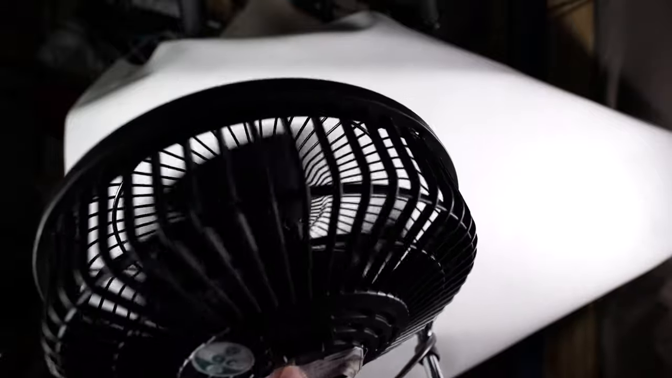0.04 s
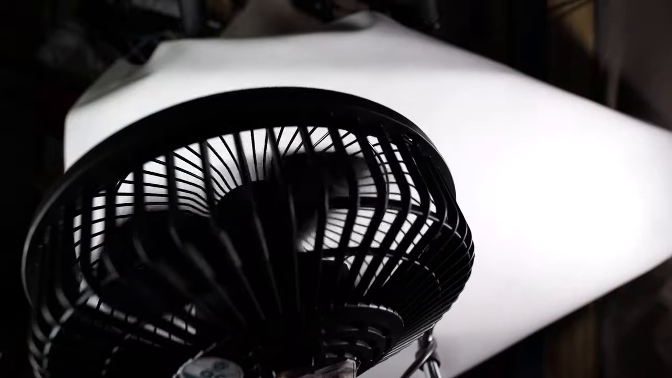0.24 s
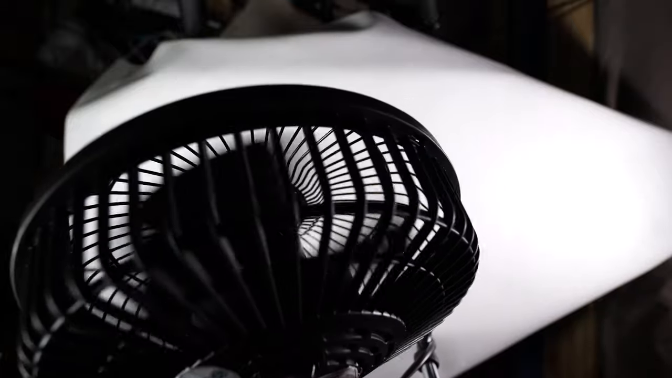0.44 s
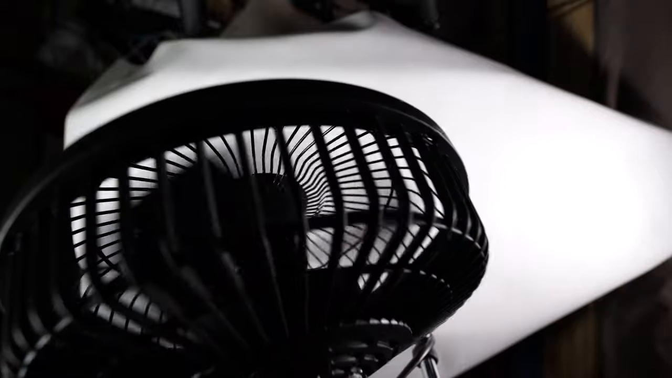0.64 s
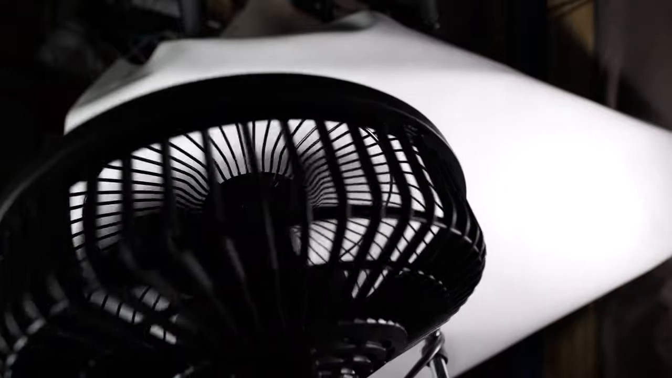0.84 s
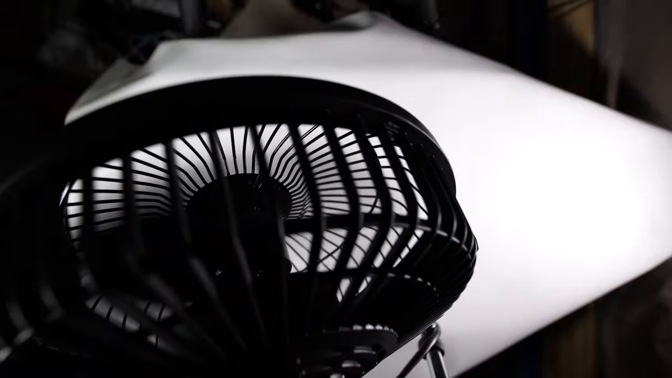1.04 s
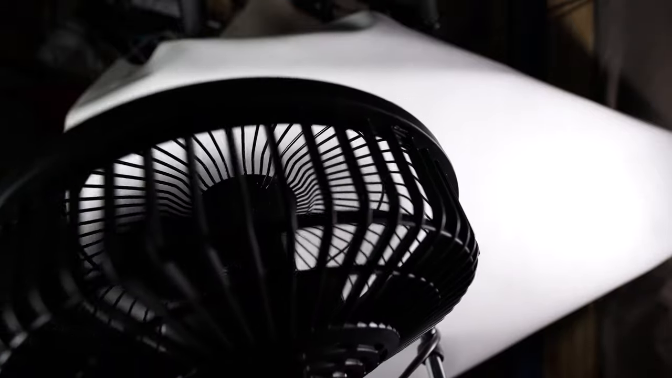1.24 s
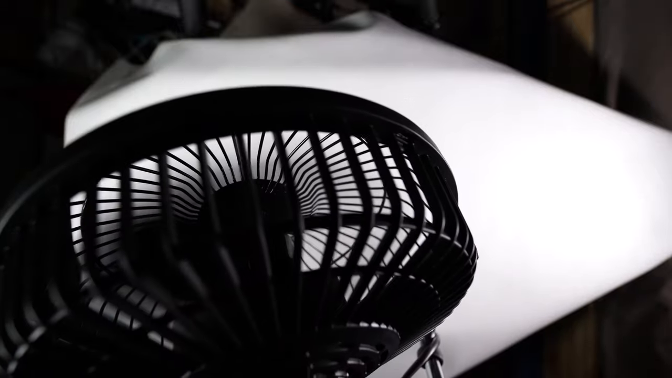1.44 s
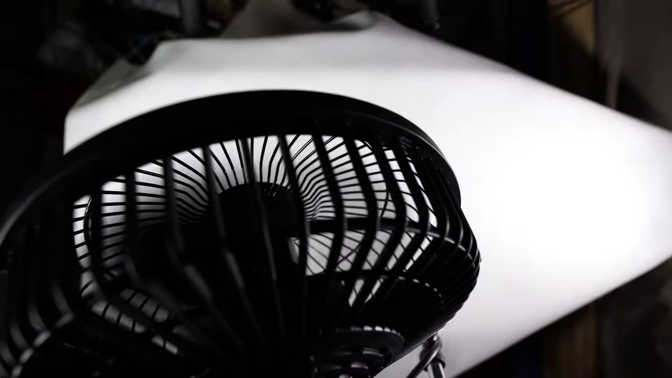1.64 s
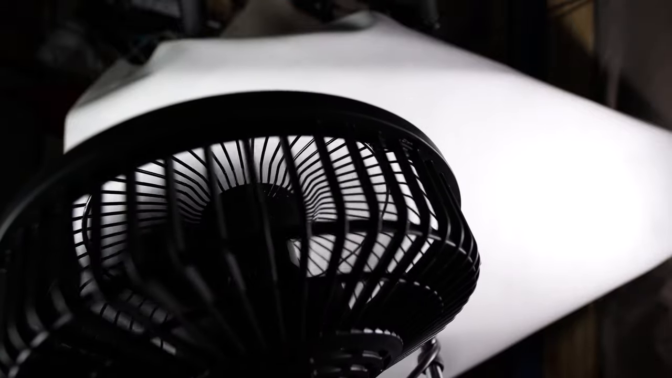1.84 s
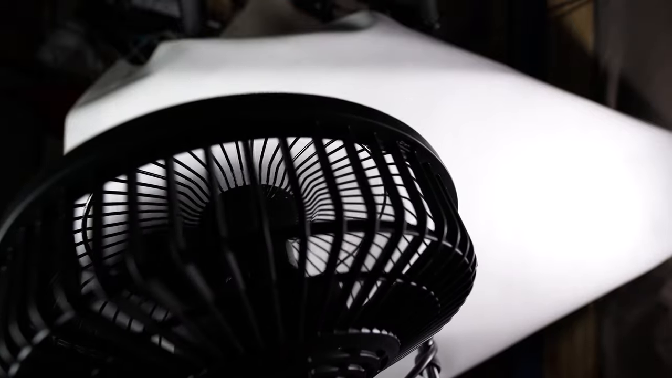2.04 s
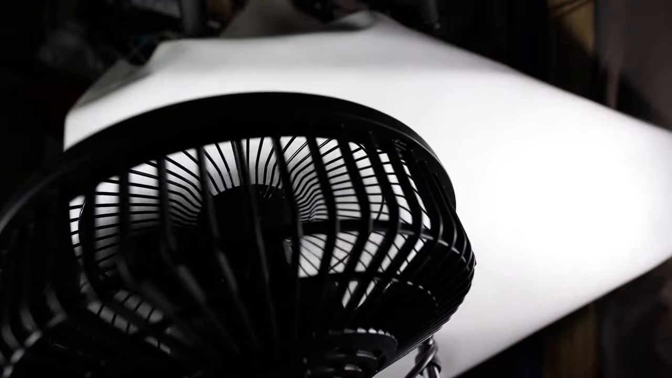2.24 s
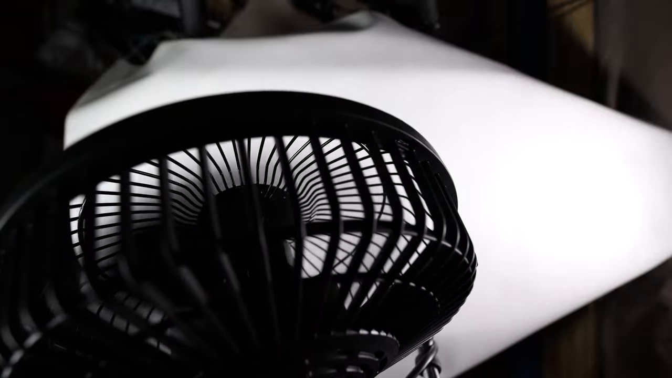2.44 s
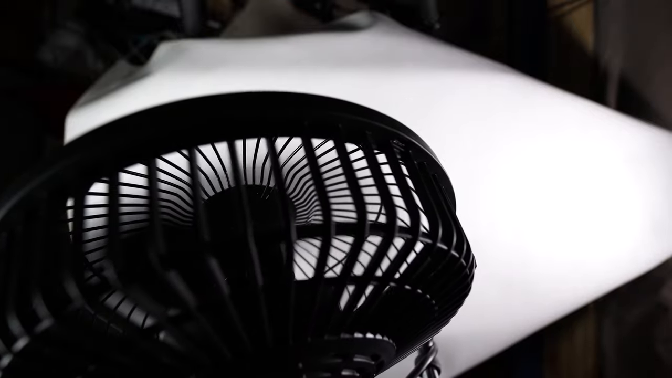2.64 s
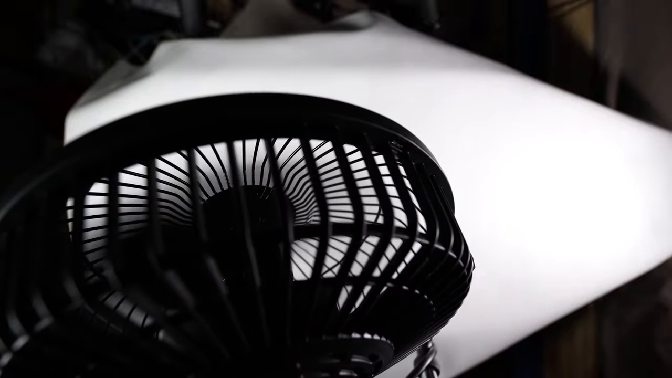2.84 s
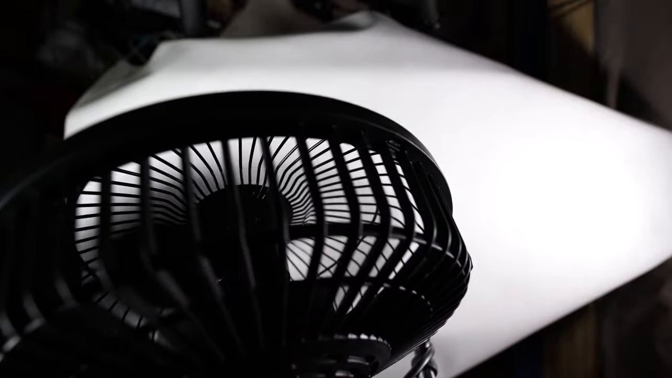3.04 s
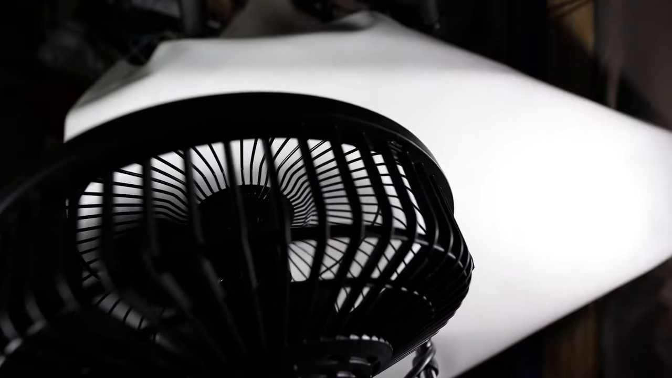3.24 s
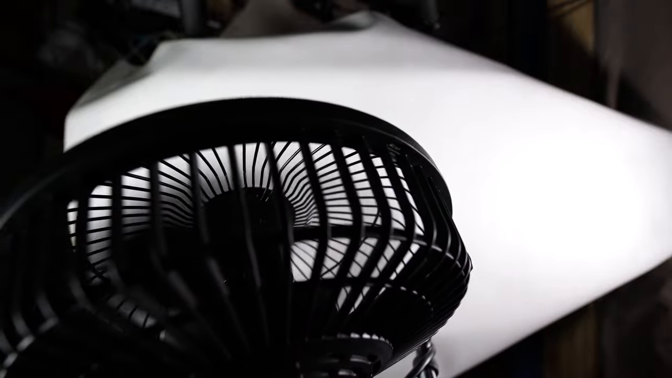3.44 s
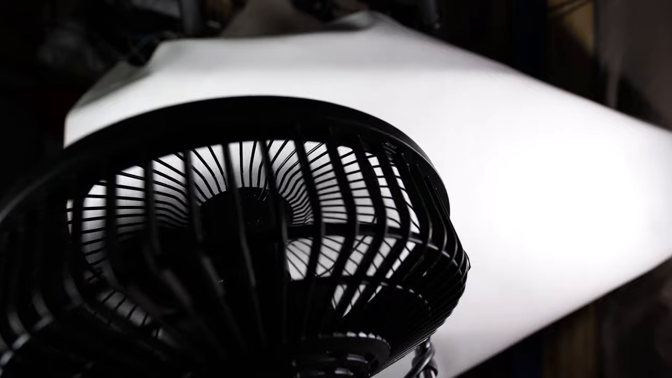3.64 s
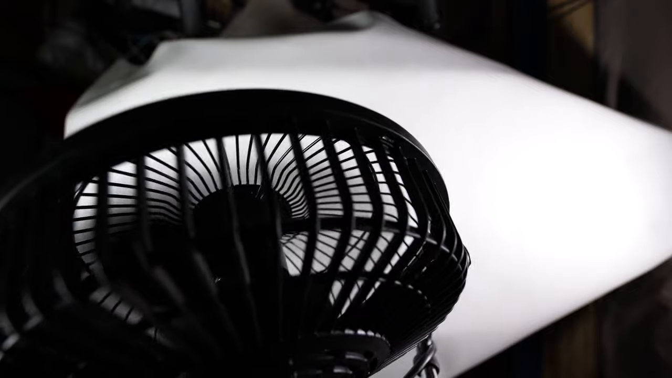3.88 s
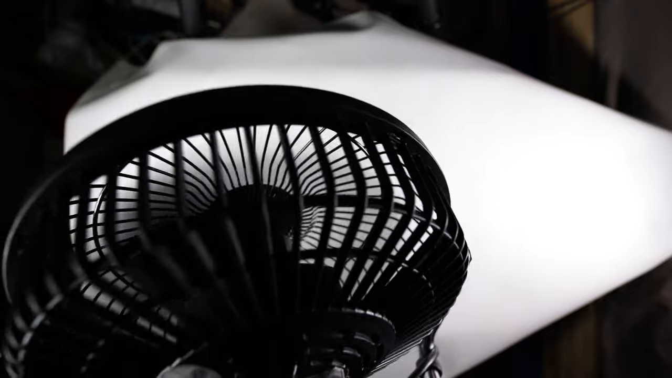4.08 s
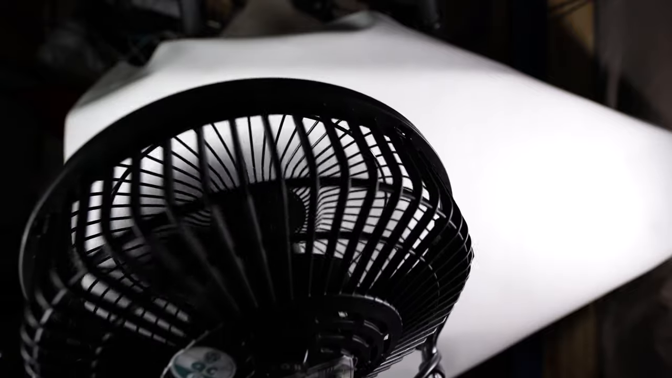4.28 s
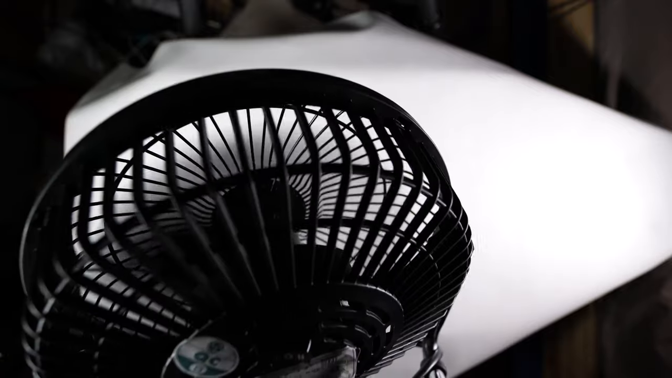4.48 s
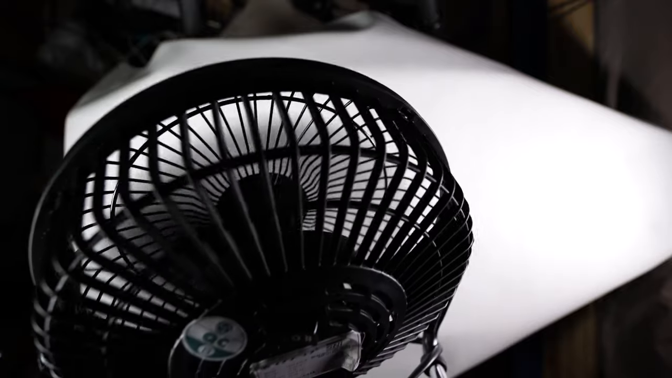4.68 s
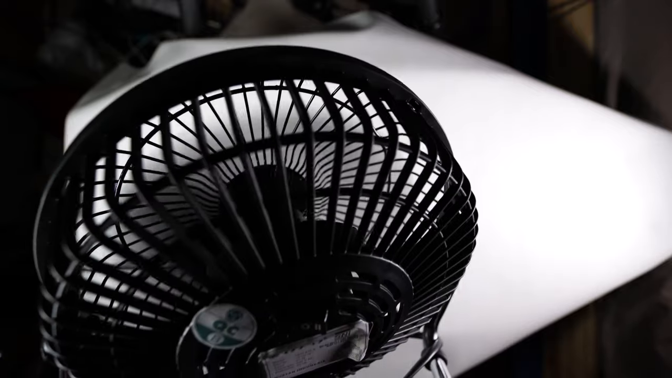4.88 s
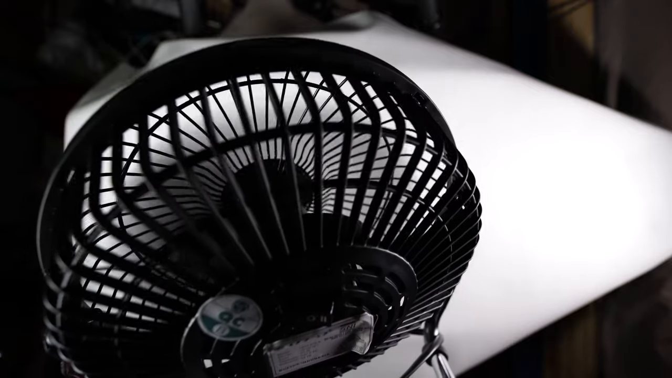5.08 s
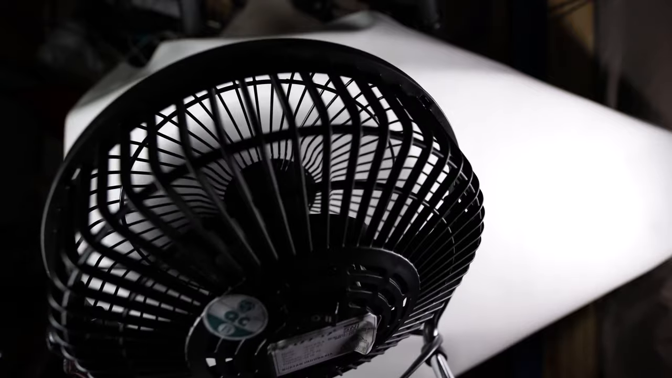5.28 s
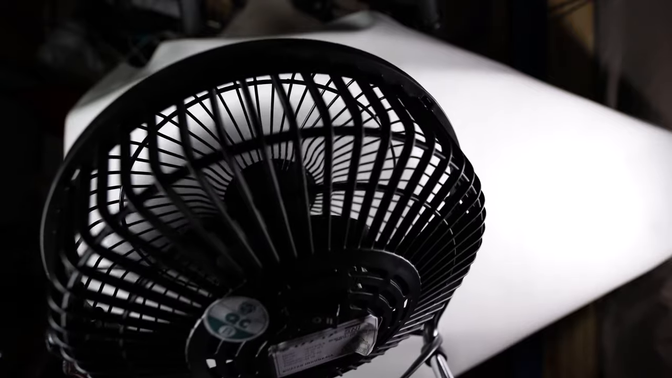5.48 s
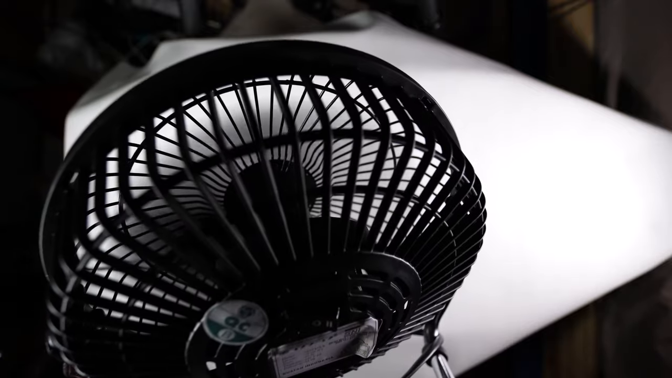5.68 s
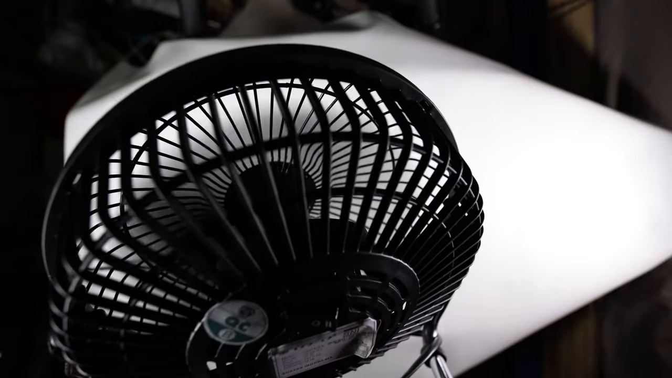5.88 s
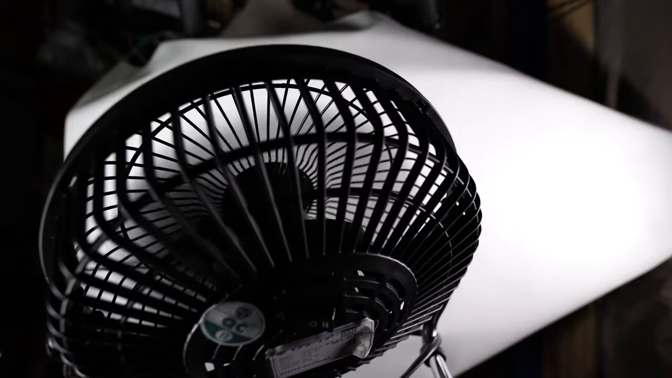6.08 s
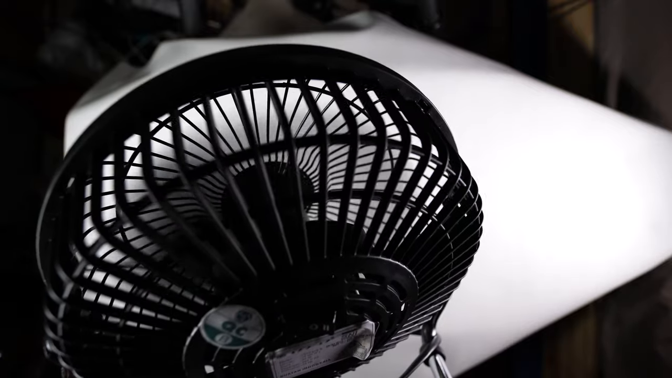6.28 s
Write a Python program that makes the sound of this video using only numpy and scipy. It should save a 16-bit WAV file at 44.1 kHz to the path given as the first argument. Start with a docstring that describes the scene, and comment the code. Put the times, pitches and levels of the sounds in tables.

```python
"""Desk fan starting up close by

In a quiet room, a hand bumps the base of a small three-bladed fan near the microphone; the switch snaps.
The stand settles, the motor hums at twice the mains frequency and the rotor brushes lightly, once a turn.
Blade tones and rushing air follow the computed rotor speed, then run steadily and sway as the fan is tilted.
Contacts ring resonances of housing and stand; air and room are coloured noise."""
import sys
import numpy as np
from scipy import signal
from scipy.fft import rfft, irfft, next_fast_len
from scipy.io import wavfile

SR = 44100
rng = np.random.default_rng(int(sys.argv[2]) if len(sys.argv) > 2 else 0)


def to_wav(s):
    """Save 16-bit WAV."""
    ch = np.atleast_2d(s).T  # columns
    pcm = np.round(np.clip(ch, -1, 1) * 32767)  # PCM
    wavfile.write(sys.argv[1], SR, pcm.astype(np.int16))


N = 278271
TIME = np.arange(N) / SR

# colour of the still room, relative: pitch_hz, level_db_per_hz
ROOM_COLOUR = [(25, -7), (50, 3), (140, -3.5), (300, -13), (470, -18), (850, -15.5), (1020, -14.5),
               (1160, -11), (1290, -24), (1600, -18), (2700, -29.5), (5000, -33), (7000, -33.5),
               (10000, -39), (15500, -44)]
# the hand bumps the base: start_s, level_db, pitch_hz, t60_s
BASE_BUMPS = [(.002, -32.5, 227, 0.14), (.135, -41, 223, 0.18), (.208, -36, 220, 0.095),
              (.222, -38.5, 324, 0.077), (0.473, -26, 174, 0.087), (.48, -33, 50.6, .12),
              (.497, -22, 115.6, 0.09), (0.64, -28, 242, 0.016), (0.647, -26.5, 87.6, 0.13),
              (0.654, -37, 54.6, 0.086)]
# small dry ticks of the frame: start_s, level_db, centre_hz, width_hz (of each of two passes), t60_s
FRAME_TICKS = [(0.3862, -45, 1470, 1940, 0.015), (0.671, -53, 5000, 8000, 0.027),
               (0.9964, -40.5, 3200, 7000, 0.008), (1.024, -55, 5000, 8000, .015)]
# the switch snaps over and rebounds, relative: start_s, level_db, grit_0_to_1, length_s (scrape falls 15 dB)
SWITCH_CONTACTS = [(.4718, 1, 0.28, 0.0023), (.4875, -32, .95, .004), (.4908, -17.5, 1, 0.003)]
# resonances of switch and housing: pitch_hz, half_width_hz (of each of two passes), level_db
HOUSING_MODES = [(990, 180, -5), (1530, 410, -2.5), (2860, 390, -5.5), (3770, 330, 3), (5330, 470, 3.5),
                 (7240, 440, 2), (7980, 610, -2), (8870, 360, -6), (11900, 300, -9), (13300, 640, -9.5)]
# the stand chatters as the hand lets go, relative: start_s, level_db, grit_0_to_1, length_s (scrape falls 15 dB)
STAND_CONTACTS = [(.6396, -33, 0.7, .004), (.6422, -17, 0.5, 0.0045), (.6445, -9.5, 0.96, 0.0032),
                  (.6475, -22.5, 1, 0.0043), (.6522, -20.5, 0.3, 0.0022)]
# resonances of the stand: pitch_hz, half_width_hz (of each of two passes), level_db
STAND_MODES = [(1060, 240, -4), (1860, 450, -2), (2430, 220, 4.5), (3760, 640, -4), (5540, 400, 5.5),
               (5500, 180, -11), (7130, 230, -3), (8400, 1300, -7.5), (13400, 1500, -21)]
# colour of the room's answer to the contacts, relative: pitch_hz, level_db_per_hz
ECHO_COLOUR = [(300, -52), (1000, -9), (1700, 4), (3000, -3.5), (3800, 2), (4500, -3), (5300, 6.5),
               (6800, -11), (8800, -6), (10500, -19), (15000, -14)]
# rotor unbalance at full speed: multiple_of_shaft_rate, level_db
UNBALANCE_PARTIALS = [(1, -37), (2, -44.5), (4, -52), (5, -59), (7, -62.5), (8, -68.5), (10, -61.5),
                      (14, -61.5)]
# colour of the rushing air at full speed, relative: pitch_hz, level_db_per_hz
AIR_COLOUR = [(25, -0.5), (130, 3), (240, -4.5), (350, -8.5), (650, -11.5), (1050, -10), (1750, -12),
              (2400, -15), (3100, -17.5), (4000, -23.5), (5100, -23), (7000, -34.5), (10500, -41.5),
              (15500, -51)]
# growth of the air, faster for hiss than for rumble: pitch_hz, growth_db_per_doubling_of_speed
AIR_GROWTH_CURVE = [(60, 4), (350, 9.5), (1000, 22.5), (2400, 22.5), (5000, 32.5), (14000, 21)]
# the air runs a little louder while the rotor gathers speed, then settles: time_s, level_db
AIR_LEVEL_SHIFT = [(1.0, 4), (2.05, 3), (2.5, -0.24), (5.0, 0.12), (6.3, -.7)]
# blade wakes slapping the guard at full speed: multiple_of_blade_rate, level_db
WAKE_PARTIALS = [(5, -50), (6, -55), (7, -54.5), (8, -52.5), (10, -59), (11, -58), (12, -62.5), (13, -60.5),
                 (14, -57.5), (16, -57.5), (17, -67.5), (18, -57)]
# guard buzz as the rotor passes through its resonance: multiple_of_blade_rate, peak_level_db
GUARD_BUZZ_PARTIALS = [(5, -39), (6, -41.5)]
# colour of the brief hiss, relative: pitch_hz, level_db_per_hz
HISS_COLOUR = [(500, -17), (2500, -4), (7000, -2), (10000, -2), (15000, -5)]
# what the brushing rings with, relative: pitch_hz, width_hz, level_db
BRUSH_RESONANCES = [(2510, 180, 3.5), (3340, 370, 3.5), (6840, 150, 8), (7550, 360, 5.5), (8900, 500, -2)]
# the rotor rubs harder: centre_s, half_length_s, level_db
HARDER_RUBS = [(0.94, .04, -63.5), (1.01, .022, -62.5)]
# blade tones: multiple_of_blade_rate, full_speed_level_db, growth_db_per_doubling_of_speed,
# extra_in_swell_db, extra_once_tilted_db, unrest_0_to_1
BLADE_PARTIALS = [(1, -21.8, 13.5, 4.5, 1, 0.02), (2, -38, 2.5, 6, 2, 0.2), (3, -48.5, 15, 7.5, -7.5, 0.18),
                  (4, -42.5, 6.5, -0.5, 0, 0.15)]
# the deep blade tone sways as the fan is moved: time_s, level_db
DEEP_TONE_SWAY = [(2.0, -0.5), (2.4, 2), (2.98, -2), (3.3, 1.5), (3.85, -1.1), (4.5, -5), (5.3, -0.5),
                  (6.3, -3.5)]
# so does the whine two octaves above it: time_s, level_db
WHINE_TONE_SWAY = [(2.2, -1), (2.8, 2), (4.0, -2), (4.55, -4.5), (5.0, 0), (5.5, -6), (6.0, -0.5)]

SWITCH_ON_S, LET_GO_S = .472, .735   # LET_GO_S: the hand leaves the base
FULL_SPEED_HZ, BLADE_COUNT = 104.15, 3   # full speed in blade passes per s
SPIN_UP_S = 1.184   # time to reach three quarters of full speed
# tilting loads the rotor for a moment: centre, half length, blade passes per s lost
TILT_S, TILT_LENGTH_S, TILT_SAG_HZ = 4.45, .4, .6
SWELL_HZ, SWELL_WIDTH_HZ = 86.6, 9.4   # blade rates at which the blade tones swell
WAKE_GROWTH_DB = 2.2   # per doubling of speed and per multiple: higher overtones come in later
MAINS_HUM_HZ, HUM_ATTACK_S = 100, .019
ROOM_HUM_DB, RUNNING_HUM_DB, HUM_OCTAVE_DB = -54, -43.5, -48.5
HELD_HUM_DB, HELD_OCTAVE_DB = 3, -8   # change while the hand presses on the base
BRUSH_START_S, BRUSH_DB = .79, -64.5   # the level is that for standstill
HISS_START_S, HISS_LENGTH_S, HISS_EDGE_S, HISS_DB = .667, .058, .008, -57.5
CUTOFF_HZ = 15800


def from_db(db):
    """Decibels to gain."""
    return 10 ** (np.asarray(db) / 20)


def rms_one(x):
    """Scale to unit rms."""
    return x / np.sqrt(np.mean(x ** 2) + 1e-20)


def in_time(rows):
    """Level curve, sample by sample."""
    time_s, level_db = np.transpose(rows)
    return np.interp(TIME, time_s, level_db)


def at_hz(points, hz):
    """Read a spectrum on a log-frequency axis."""
    known_hz, values = np.transpose(points)
    return np.interp(np.log(np.maximum(hz, 1)), np.log(known_hz), values)


def ramp(start, length):
    """An envelope that rises evenly from 0 to 1 and stays there."""
    return np.clip((TIME - start) / length, 0, 1)


def bell(x, centre, width):
    """A smooth hump of height 1."""
    return np.exp(-((x - centre) / width) ** 2)


def dying(start, t60):
    """An envelope that jumps to 1 and falls 60 dB in t60."""
    return (TIME >= start) * np.exp(-np.log(1000) * np.clip((TIME - start) / t60, 0, 2))


def drift(rate):
    """Slow chance of spread 1 that changes about `rate` times a second."""
    step = 40   # samples between slow values
    r = np.exp(-2 * np.pi * rate * step / SR)
    chance = rng.standard_normal(N // step + 2002)
    slow = signal.lfilter([1], [1, -2 * r, r * r], chance)[2000:]   # the filter has settled
    return np.interp(np.arange(N) / step, np.arange(len(slow)), rms_one(slow))


def noise(spectrum):
    """Noise of unit rms with the given colour and nothing below hearing."""
    size = next_fast_len(N)
    hz = np.fft.rfftfreq(size, 1 / SR)
    gain = from_db(at_hz(spectrum, hz)) * (hz > 18)
    return rms_one(irfft(rfft(rng.standard_normal(size)) * gain, size)[:N])


def resonate(x, hz, width):
    """One resonance, with a gain of 1 at its centre."""
    r = np.exp(-np.pi * width / SR)
    poles = [1, -2 * r * np.cos(2 * np.pi * hz / SR), r * r]
    return (1 - r * r) / 2 * signal.lfilter([1, 0, -1], poles, x + 1e-18)


def unsteady_tone(angle, unrest, rate):
    """A partial of about unit rms, shaken in level and phase by eddies."""
    shaken = (1 + unrest * drift(rate)) * np.cos(angle) + unrest * drift(rate) * np.sin(angle)
    return -np.sqrt(2 / (1 + 2 * unrest ** 2)) * shaken


def room():
    """The still room is steady, faint coloured noise."""
    return from_db(-49.5) * noise(ROOM_COLOUR)


def mains_hum():
    """A faint room hum, then the motor's iron too, at twice the mains frequency; it beats with the blade tones."""
    powered = ramp(SWITCH_ON_S, HUM_ATTACK_S)
    held = 1 - ramp(LET_GO_S, HUM_ATTACK_S)
    hum = powered * from_db(RUNNING_HUM_DB + HELD_HUM_DB * held)
    octave = powered * from_db(HUM_OCTAVE_DB + HELD_OCTAVE_DB * held)
    angle = 2 * np.pi * MAINS_HUM_HZ * TIME
    return np.sqrt(2) * ((from_db(ROOM_HUM_DB) + hum) * np.sin(angle) + octave * np.sin(2 * angle))


def bumps():
    """Soft pushes on the base set it thudding briefly, each a dying sine."""
    out = np.zeros(N)
    for start, db, hz, t60 in BASE_BUMPS:
        out += from_db(db) * dying(start, t60) * np.sin(2 * np.pi * hz * (TIME - start))
    return out


def ticks():
    """Brief, broad cracks of the frame with hardly any ring."""
    out = np.zeros(N)
    for start, db, hz, width, t60 in FRAME_TICKS:
        crack = resonate(resonate(rng.standard_normal(N), hz, width), hz, width)
        out += from_db(db) * dying(start, t60) * rms_one(crack)
    return out


def strike(contacts, modes, echo_db, echo_t60):
    """Each contact is a sharp blow with some grit; it rings the part, and the room answers."""
    force, echo_power = np.zeros(N), np.zeros(N)
    for start, db, grit, length in contacts:
        scrape = dying(start, 4 * length) * rng.choice([-1, 1], N)
        force += from_db(db) * grit * scrape / np.sqrt(np.sum(scrape ** 2))
        force[round(start * SR)] += from_db(db) * np.sqrt(1 - grit ** 2)
        echo_power += (from_db(db) * dying(start, echo_t60)) ** 2
    ringing = np.zeros(N)
    for hz, half_width, db in modes:
        # two passes: each resonance swells for a moment as the blow spreads through the part
        spreading = resonate(force, hz, 2 * half_width)
        ringing += from_db(db) * resonate(spreading, hz, 2 * half_width)
    return ringing + from_db(echo_db) * np.sqrt(echo_power) * noise(ECHO_COLOUR)


def switch_snap():
    """The switch snaps over, rebounds and rings the housing."""
    return from_db(12.5) * strike(SWITCH_CONTACTS, HOUSING_MODES, echo_db=-52.0, echo_t60=.32)


def stand_settling():
    """The stand chatters through a few gritty contacts and rings."""
    return from_db(11.0) * strike(STAND_CONTACTS, STAND_MODES, echo_db=-51.0, echo_t60=.25)


def rotor_speed(tilting):
    """Blade passes per s: a steady torque works against air drag that grows with the square of the speed."""
    free = FULL_SPEED_HZ * np.tanh((TIME - SWITCH_ON_S) / SPIN_UP_S)
    return np.maximum(free - TILT_SAG_HZ * tilting, 0)


def unbalance(angle, doublings, growth_db=9.0):
    """The rotor shakes the stand once a turn, that is once in three blade passes."""
    shaft = angle / BLADE_COUNT
    shake = np.zeros(N)
    for k, db in UNBALANCE_PARTIALS:
        shake += from_db(db) * np.sqrt(2) * np.sin(k * shaft + rng.uniform(0, 2 * np.pi))
    return shake * from_db(growth_db * doublings)


def air(angle, doublings, level_db=-37.0, flutter_db=.58):
    """Turbulence grows louder and brighter with speed, flutters by octave and pulses with blades and shaft."""
    rest, out = noise(AIR_COLOUR), np.zeros(N)
    for top_hz in np.geomspace(125, 16000, 8):
        # peel off one octave at a time, from the bottom
        lowpass = signal.butter(2, top_hz, fs=SR, output="sos")
        band = signal.sosfiltfilt(lowpass, rest, padtype="even")
        rest = rest - band
        growth_db = at_hz(AIR_GROWTH_CURVE, top_hz / np.sqrt(2)) * doublings
        out += band * from_db(growth_db + flutter_db * drift(25))
    pulsing = 1 + .025 * np.cos(angle) + .04 * np.cos(angle / BLADE_COUNT)
    return out * from_db(level_db + in_time(AIR_LEVEL_SHIFT)) * pulsing


def wakes(angle, blade_hz, doublings, resonance_hz=90.8, resonance_width_hz=.9):
    """Blade wakes meet the guard and add overtones, the higher the more blurred; near one speed the guard buzzes."""
    out = np.zeros(N)
    for k, db in WAKE_PARTIALS:
        phase = rng.uniform(0, 2 * np.pi)
        partial = unsteady_tone(k * angle + phase, unrest=.15 + .05 * k, rate=8)
        out += from_db(db + WAKE_GROWTH_DB * k * doublings) * partial
    in_resonance = bell(blade_hz, resonance_hz, resonance_width_hz)
    for k, db in GUARD_BUZZ_PARTIALS:
        out += in_resonance * from_db(db) * np.sin(k * angle)
    return ramp(start=.42, length=.7) * out


def hiss():
    """A short, even hiss of coloured noise that starts and stops quickly."""
    fade_s = HISS_START_S + HISS_LENGTH_S - HISS_EDGE_S
    envelope = ramp(HISS_START_S, HISS_EDGE_S) - ramp(fade_s, HISS_EDGE_S)
    return from_db(HISS_DB) * envelope * noise(HISS_COLOUR)


def brushing(angle, slip, catch_db=-.5):
    """A faint rub presses once a turn, catches unevenly on each resonance and fades as the rotor runs free."""
    level = from_db(BRUSH_DB) * slip * (TIME > BRUSH_START_S)
    for centre, half_length, db in HARDER_RUBS:
        level = level + from_db(db) * bell(TIME, centre, half_length)
    pressing_db = 3.5 * drift(90) + catch_db * np.cos(angle / BLADE_COUNT)
    friction = rng.standard_normal(N) * from_db(pressing_db)
    rub = np.zeros(N)
    for hz, width, db in BRUSH_RESONANCES:
        rub += resonate(friction * from_db(db + 3.5 * drift(40)), hz, width)
    return level * rms_one(rub)


def blades(angle, blade_hz, doublings):
    """Each blade brings a dip of pressure; its partials follow the speed, swell on the way up, shift with the tilt."""
    swell = bell(blade_hz, SWELL_HZ, SWELL_WIDTH_HZ)
    tilted = ramp(TILT_S - 2 * TILT_LENGTH_S, TILT_LENGTH_S)
    sway_db = {1: in_time(DEEP_TONE_SWAY), 4: in_time(WHINE_TONE_SWAY)}
    pulse = np.zeros(N)
    for k, db, growth_db, swell_db, tilted_db, unrest in BLADE_PARTIALS:
        level_db = db + growth_db * doublings + swell_db * swell
        level_db = level_db + tilted_db * tilted + sway_db.get(k, 0)
        pulse += from_db(level_db) * unsteady_tone(k * angle, unrest, rate=8.8)
    return ramp(start=.85, length=.3) * pulse


def scene():
    """One rotor speed drives blades, wakes, shaking, brushing and air; hum, handling and room are added."""
    tilting = bell(TIME, TILT_S, TILT_LENGTH_S)
    blade_hz = rotor_speed(tilting)
    angle = 2 * np.pi * np.cumsum(blade_hz) / SR
    doublings = np.log2(np.maximum(blade_hz, 1) / FULL_SPEED_HZ)   # 0 at full speed
    slip = 1 - blade_hz / FULL_SPEED_HZ   # 1 at standstill
    background = room() + mains_hum()
    handling = bumps() + ticks() + switch_snap() + stand_settling() + hiss()
    rotor = unbalance(angle, doublings) + wakes(angle, blade_hz, doublings)
    rotor = rotor + brushing(angle, slip) + blades(angle, blade_hz, doublings)
    return (background + handling + rotor + air(angle, doublings))[None]


def record(dry):
    """The snap briefly overloads the microphone input; the top is cut steeply."""
    ceiling = .27   # full scale is 1
    limited = dry / (1 + (dry / ceiling) ** 8) ** (1 / 8)
    faded = limited * (1 - ramp(TIME[-1] - .004, .004))
    lowpass = signal.ellip(10, .1, 80, CUTOFF_HZ, fs=SR, output="sos")
    return signal.sosfilt(lowpass, faded)


dry = scene()
out = record(dry)
to_wav(out)
```